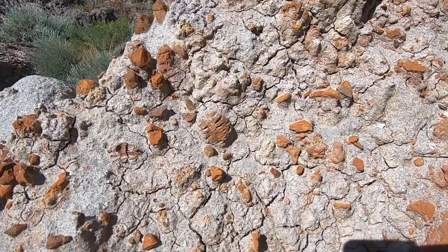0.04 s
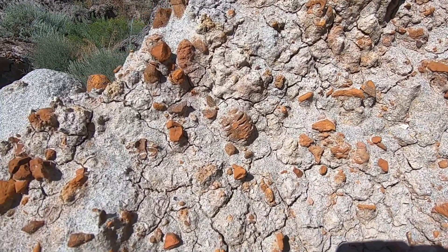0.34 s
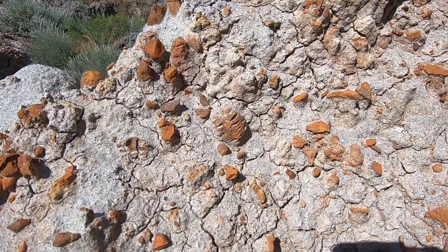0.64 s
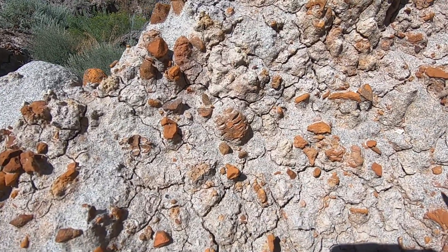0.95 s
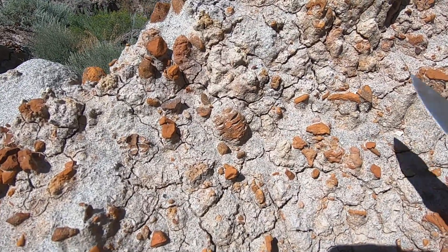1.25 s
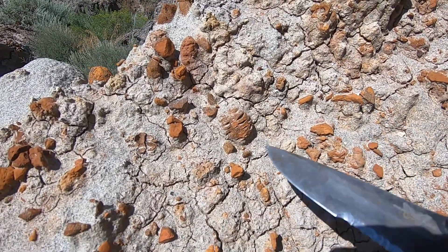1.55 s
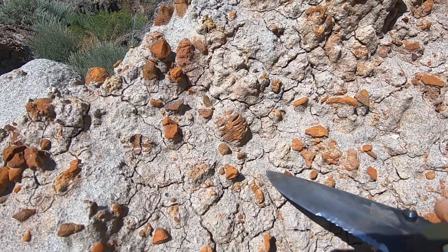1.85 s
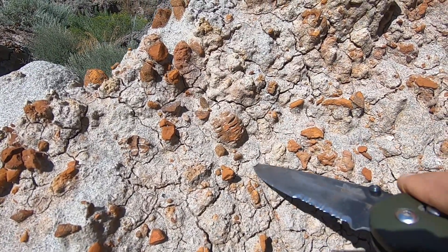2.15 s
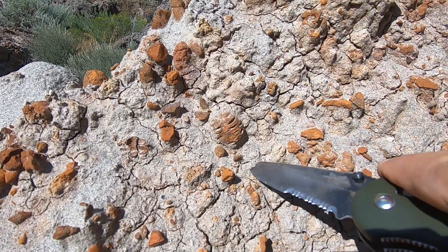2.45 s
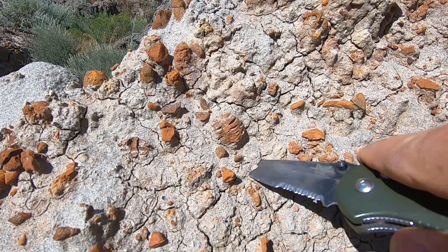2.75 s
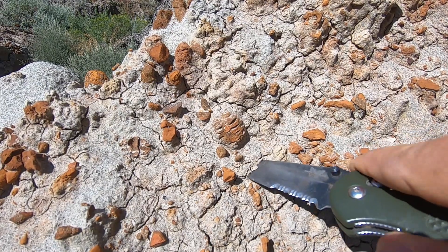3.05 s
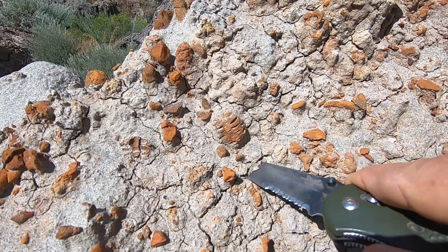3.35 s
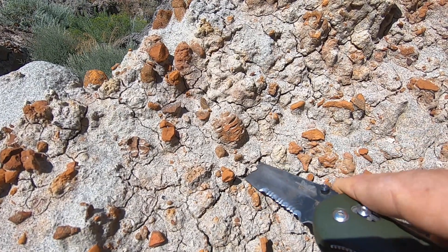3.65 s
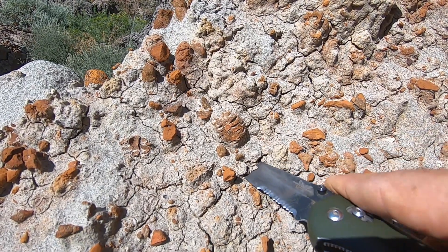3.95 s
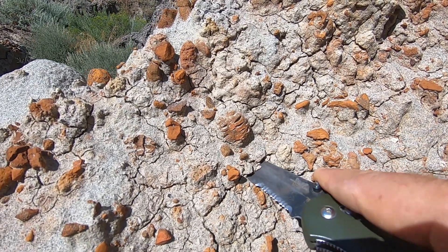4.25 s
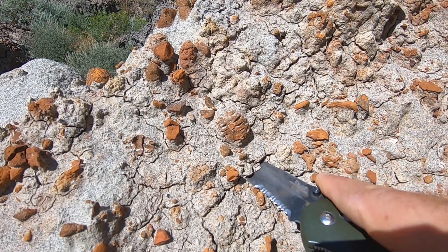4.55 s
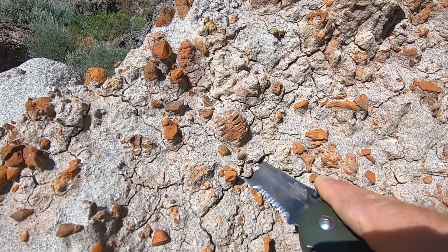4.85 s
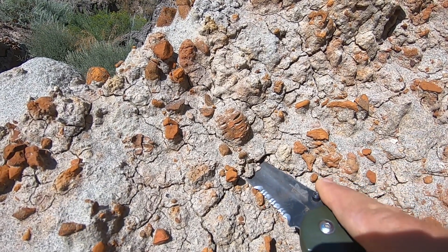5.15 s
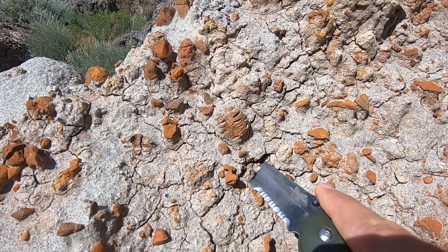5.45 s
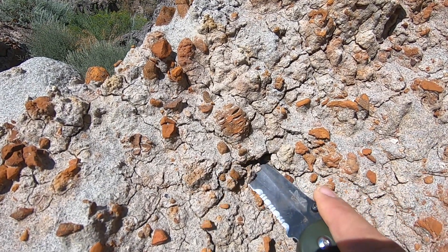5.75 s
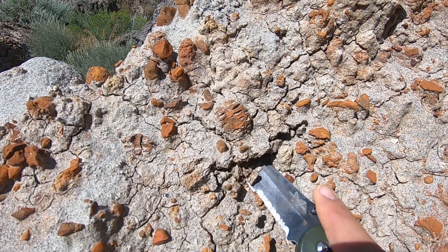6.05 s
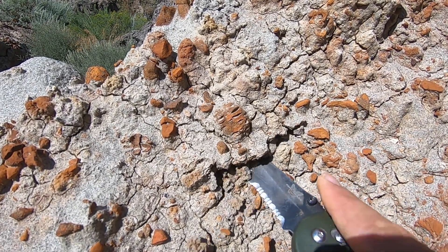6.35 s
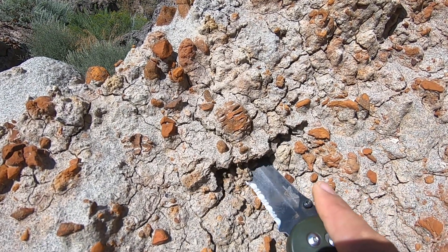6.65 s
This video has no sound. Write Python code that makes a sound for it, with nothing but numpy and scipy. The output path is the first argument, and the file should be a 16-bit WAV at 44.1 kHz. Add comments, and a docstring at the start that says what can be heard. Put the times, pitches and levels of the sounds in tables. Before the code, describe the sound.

A low thump of wind hits the microphone at the very start, followed by finger knocks, rubbing and dull bumps on it until about 0.5 seconds, with a faint sleeve rustle. At about 1.1 seconds a folding knife snaps open with a sharp, loud metallic click, and a hand slides softly on the handle. From 2 seconds the tip scratches crumbly rock, close and slightly to the right, in short, irregular, gritty strokes, with light steel ticks on pebbles and small crunches as flakes break off. A few very faint, thin, high chirps sound far away around 2 and 4 seconds. The microphone is knocked again near 4.3 and 6.5 seconds. The scraping eases around 5 seconds, then resumes as crumbs trickle down. From about 5.4 seconds low wind rumble builds in gusts, strongest at the end, near 7 seconds.

```python
"""A gust of wind thumps on the microphones; fingers knock and rub on a hand-held camera, exciting the
modes of its case, and a sleeve rustles. A folding knife snaps open with a rattle of steel impacts.
Its tip ticks on pebbles and scrapes crumbly rock in short strokes: tiny fractures make the hiss and
drive the blade's resonances, flakes crack off and crumbs trickle down. Thin, high chirps sound far off,
and the wind builds again near the end."""
import sys
import numpy as np
from scipy import signal
from scipy.fft import rfft, irfft
from scipy.io import wavfile
from scipy.ndimage import map_coordinates

SR = 44100
rng = np.random.default_rng(int(sys.argv[2]) if len(sys.argv) > 2 else 0)


def store_wav(level_fs):
    """Save 16-bit WAV to argv[1]."""
    pcm = np.round(np.clip(np.atleast_2d(level_fs), -1, 1) * 32767)
    wavfile.write(sys.argv[1], SR, pcm.T.astype(np.int16))


N = 304485
TIME = np.arange(N) / SR

# Levels in the tables are relative: the functions add gains of their own.
# gusts on the microphones: start_s, rise_s, fall_s, level_db, left_minus_right_db
GUSTS = [(-.03, 0.027, 0.023, -14, 1), (5.39, 0.11, 0.088, -37.5, 11), (5.62, 0.022, .12, -34.5, 22),
         (5.81, 0.067, 0.091, -32, 14), (5.96, 0.062, 0.14, -31, 9), (6.22, 0.076, 0.12, -36.5, 2.5),
         (6.42, 0.065, 0.46, -40, 2), (6.6, 0.19, 0.079, -36, 1), (6.82, 0.086, .1, -27, 1)]
# spectra of the eddies and of still air: frequency_hz, density_db
WIND_SPECTRUM = [(10, -5), (20, 4.5), (36, 4.5), (85, -1.5), (130, -14), (180, -18.5), (260, -37.5),
                 (500, -47.5), (1000, -68.5)]
AIR_SPECTRUM = [(20, -16), (90, -7.5), (180, 6.5), (450, -5), (850, 2), (2200, -5), (4200, -4), (5800, 1),
                (7600, -12), (9600, -6), (11500, -30), (15500, -48)]

# arm sweeps and squeezes of the hand: start_s, rise_s, fall_s, level_db
SWEEPS = [(0, 0.33, 0.31, -56.5), (.67, 0.026, 0.032, -60), (.78, 0.27, 0.074, -51.5),
          (1.225, 0.024, 0.035, -52), (1.3, .04, 0.23, -57), (1.73, 0.065, 0.053, -56.5)]
SQUEEZES = [(1.85, 0.15, 0.19, -49.5), (2.55, 0.14, 0.15, -50), (3.92, 0.081, 0.46, -59),
            (4.74, 0.028, 0.22, -54)]
# spectra of the arm's rustle and the hand's hum: frequency_hz, density_db
RUSTLE_SPECTRUM = [(200, -51), (500, -12), (1000, 2), (1700, 5.5), (2900, 6), (4300, 4), (5800, 10),
                   (7700, -2), (9800, 2), (11300, -16.5), (15500, -21)]
HAND_SPECTRUM = [(25, -40), (90, -23.5), (135, -2), (175, 10.5), (230, 1.5), (400, -11.5), (800, -43)]
# scuffs of the hand on the knife and finger knocks on the camera: start_s, level_db
SCUFFS = [(0.324, -31.5), (0.499, -34), (0.535, -29), (1.238, -41)]
KNOCKS = [(0.053, -44), (0.178, -31.5), (0.21, -24.5), (0.216, -29), (0.283, -21.5), (0.29, -32),
          (0.322, -30), (0.357, -27.5), (0.376, -26), (0.389, -25), (0.406, -26.5), (0.58, -47),
          (0.591, -35.5), (0.667, -41.5), (2.649, -34.5), (2.887, -33.5), (2.905, -27), (4.045, -34),
          (4.075, -43), (4.244, -35), (4.27, -19), (4.476, -43.5), (6.492, -17.5)]
# finger rubs, jolts of the grip and a skin squeak on the camera: start_s, rise_s, fall_s, level_db
RUBS = [(.16, 0.017, 0.044, -37), (.195, 0.012, 0.074, -33.5), (.278, 0.0028, 0.18, -32),
        (.35, 0.02, 0.11, -33), (.57, 0.015, 0.071, -58), (1.88, 0.17, 0.036, -51.5),
        (2.6, 0.071, 0.1, -49), (2.884, 0.0088, 0.016, -47), (3.95, 0.098, 0.031, -45),
        (4.22, 0.018, 0.048, -39.5), (4.28, 0.026, 0.015, -49), (4.9, 0.034, 0.054, -54),
        (6.485, 0.0082, 0.025, -34)]
JOLTS = [(.152, 0.019, 0.097, -34), (.281, 0.0055, 0.05, -20.5), (.335, 0.019, 0.034, -26)]
SQUEAKS = [(.175, 0.13, 0.11, -42.5)]
# modes of the case, the whole camera rocking, and skin on the case: pitch_hz, level_db, t60_s
CASE_MODES = [(307, -15, 0.079), (506, -21, 0.17), (718, -3, 0.069), (1116, 7.5, 0.03), (1270, 6, 0.02),
              (1820, 4, 0.019), (1930, 0, 0.03)]
ROCKING_MODES = [(177, 2, 0.065), (313.3, -6.5, 0.09), (386, -3, 0.021), (500, -4, 0.036),
                 (656, 5.5, 0.012), (1460, -13, 0.0048)]
SQUEAK_MODES = [(2740, -6.5, 0.011), (3670, -6, 0.0076), (4550, 1, 0.0076), (6000, -4, 0.009)]
# spectra of a jolt and of the sleeve's threads: frequency_hz, density_db
JOLT_SPECTRUM = [(20, -24), (50, 11.5), (80, 4), (120, 7), (180, 1.5), (260, -18), (500, -21), (1000, -61)]
SLEEVE_SPECTRUM = [(500, -31), (1500, -7), (4500, 4.5), (6200, 2.5), (7600, -5), (9600, 4.5), (11200, -16),
                   (14500, -20), (15500, -39)]
# light scratches of the sleeve: start_s, rise_s, fall_s, level_db
SLEEVE_SCRATCHES = [(.425, 0.0074, .025, -61), (.532, .004, 0.013, -51), (.625, 0.0065, 0.013, -60),
                    (.69, 0.022, 0.047, -54.5), (1.03, 0.18, 0.06, -60.5), (1.3, 0.041, 0.081, -57)]
# hollow taps from the handling: start_s, level_db, pitch_hz
TAPS = [(.634, -51, 430), (.69, -54, 415), (6.493, -36, 498)]

# contacts of the blade swinging into its lock: start_s, level_db
LOCK_CONTACTS = [(1.0772, -11), (1.0776, -13.5), (1.0792, -10), (1.0797, -8), (1.0803, -7.5), (1.081, -2.5),
                 (1.081, -9.5), (1.0825, -11.5)]
# spectrum of steel cracking on steel: frequency_hz, density_db
SNAP_SPECTRUM = [(400, -30), (2500, -2), (9500, -7), (14000, -18)]
# modes of the knife's frame and liner, its handle and the rubbed steel: pitch_hz, level_db, t60_s
FRAME_MODES = [(840, -16, 0.0049), (2190, -3.5, 0.0064), (2730, -10, 0.0057), (3460, -16, 0.012),
               (4800, -7.5, 0.0028), (6360, -11.5, 0.01), (7000, -10, 0.01), (8630, -6, 0.0041),
               (9750, -15.5, 0.008), (9750, -16, 0.0081)]
HANDLE_MODES = [(1400, 1, 0.0088), (2270, 8.5, 0.0073), (2710, 11.5, 0.0046), (3700, -15, 0.011),
                (5600, 8.5, 0.0064), (6400, -18, 0.004)]
STEEL_MODES = [(2870, 2, 0.019), (3830, 0, .03), (5700, -9, 0.028), (6600, -4, .018)]
# a finger drawn along the steel and the hand sliding to a new hold: start_s, rise_s, fall_s, level_db
FINGER_DRAWS = [(1.335, 0.071, 0.089, -56.5), (1.47, 0.069, .03, -52)]
HAND_SLIDES = [(1.5, 0.069, 0.024, -42.5), (1.675, 0.0093, 0.0085, -54)]

# the tip catches on pebbles: start_s, level_db, ring_db, pitch_ratio, rebound_ratio
TICKS = [(1.721, -43, 2.5, 1.01, 0.62), (2.032, -45, -3.5, 1, 0.65), (2.111, -43.5, 1, .5, 0.2),
         (2.189, -39.5, -1.5, 1.52, 0.1), (2.216, -41, -4, .5, 0.1), (2.7, -41, -3, 1.06, 0.2),
         (2.758, -28.5, -6, 1.03, 0.27), (2.9284, -35.5, -3, 1.04, 0.3), (2.956, -44, -6, 1.3, .2),
         (3.086, -36, -7, 1, 0), (3.272, -47, 1, 0.91, 0.28), (3.384, -42, -7, 0.92, 0.3),
         (3.516, -40.5, -1.5, 1.05, .05), (3.728, -46, -14, .63, 0), (3.799, -52, 0, 1.04, .3),
         (3.905, -37, -16, 0.95, 0.53), (4.1558, -30, -5, 1.2, 0.1), (4.178, -37, -10, 1.03, 0.61),
         (4.502, -38, -24, 0.46, 0.75), (4.718, -44, 6, 0.96, 0.67), (4.751, -34.5, -8, 0.72, 0.66),
         (5.588, -53, 3, 0.83, 0.1), (5.7961, -51.5, 9, 0.98, 0.82), (5.82, -39.5, -5, 0.6, 0.74),
         (5.9648, -34, -16, 0.97, 0.2), (5.98, -39, -3, 1.01, 0.64), (6.045, -40.5, -6, 0.88, 0.2),
         (6.102, -35.5, -2, 1.1, 0), (6.5442, -39.5, 0.5, .86, 0.16), (6.5927, -29, -17, 0.99, 0.36),
         (6.73, -42, 3, 1.03, 0.71)]
# modes of the briefly ringing blade: pitch_hz, level_db, t60_s
BLADE_MODES = [(2870, -30, 0.033), (4000, -13.5, 0.024), (5300, -7.5, 0.042), (5554, -3, 0.019),
               (5830, -3, 0.017), (6350, -18, 0.012), (6500, -25, .012), (8830, -13.5, 0.038),
               (9470, -15.5, 0.015)]
# far chirps: start_s, length_s, from_hz, to_hz, level_db
CHIRPS = [(1.863, 0.028, 9900, 9150, -74.5), (1.938, 0.023, 9200, 8900, -65.5),
          (3.997, 0.062, 9000, 9260, -59.5), (4.38, 0.07, 8100, 8700, -75)]
# strokes of the tip over the rock: start_s, rise_s, fall_s, level_db, brightness_db, blade_song_db
STROKES = [(2.065, 0.059, 0.081, -46.5, 12.5, 4), (2.2, 0.086, 0.019, -45, 14, 3),
           (2.31, 0.011, 0.026, -51.5, -1, -4), (2.428, 0.03, 0.12, -41, 10, -9.5),
           (2.56, 0.034, 0.16, -40.5, 9, -5), (2.738, 0.029, 0.059, -37.5, 11, 2),
           (2.868, 0.024, 0.077, -44, 9.5, -10), (3.0, 0.022, 0.045, -40, 13, -1.5),
           (3.06, 0.022, 0.12, -51, 11.5, -4), (3.252, 0.017, 0.08, -46, 9.5, 0),
           (3.355, 0.037, 0.13, -53, 13.5, -7.5), (3.557, 0.033, 0.04, -43, 8, -8),
           (3.63, 0.043, 0.082, -59, 10, -17), (3.83, 0.12, 0.1, -52, 10.5, -17),
           (4.02, 0.051, 0.028, -56.5, 13.5, -4), (4.121, 0.014, .088, -42.5, 15, -8),
           (4.165, 0.017, 0.069, -43.5, 8.5, 1), (4.28, 0.022, 0.02, -58, 9.5, -17),
           (4.497, 0.0029, 0.13, -55.5, 8, -32), (4.715, 0.0057, 0.022, -52, 2, -25),
           (4.75, 0.0016, 0.039, -37.5, -15, -39), (4.79, 0.02, 0.042, -52.5, 10, -15),
           (4.885, 0.03, 0.055, -56.5, -11, -32), (5.055, 0.14, 0.029, -62.5, 11.5, -16),
           (5.3, 0.091, 0.14, -63, 7.5, -5), (5.56, 0.17, 0.064, -59.5, 10, -6),
           (5.79, 0.1, 0.073, -54.5, 10, -11.5), (5.95, 0.021, 0.12, -47, -2.5, -2),
           (6.07, 0.04, 0.14, -54.5, 9.5, -5), (6.32, 0.13, 0.077, -49, 6.5, -20),
           (6.553, 0.0022, 0.072, -44, 10, -31)]
# modes of the blade damped against the rock: pitch_hz, bandwidth_hz, level_db
PRESSED_MODES = [(2915, 300, 10), (5700, 320, -2)]
# shift of those modes with the point of contact: time_s, pitch_ratio
CONTACT_PITCH = [(1.5, 1.02), (2.1, 0.94), (2.28, 0.93), (2.5, 1.05), (2.8, 1), (3.1, 0.91), (3.29, .9),
                 (3.6, 1.04), (6.9, 0.94)]
# spectra of crumbling rock, its crust, and sand cracking under the edge: frequency_hz, density_db
GRIT_SPECTRUM = [(120, -31), (300, -7), (600, -9.5), (1000, -11.5), (1400, -5), (1850, -6.5), (2250, -6),
                 (4300, -1.5), (6400, -1.5), (7400, -12.5), (9800, -14), (11000, -24.5), (13500, -30),
                 (15500, -40)]
CRUST_SPECTRUM = [(120, -17), (200, 4), (330, -5), (480, 0), (750, -11), (1200, 1), (1600, 2), (2300, -8),
                  (3000, -2.5), (5000, -12.5), (12000, -48)]
SIZZLE_SPECTRUM = [(2000, -39), (6200, -14), (7500, 6.5), (9600, -0.5), (10800, -21), (13500, -20),
                   (15500, -48)]
# bits of crust give way: start_s, level_db, pitch_hz
CRUNCHES = [(2.326, -43.5, 1790), (2.628, -36.5, 1730), (2.888, -43, 1700), (2.904, -36, 1920),
            (3.76, -50, 2420), (3.951, -36.5, 1930), (3.972, -44, 2160), (4.015, -44.5, 2490),
            (4.045, -40.5, 1900), (4.058, -44.5, 2400), (4.078, -41, 2540), (4.269, -39.5, 1500),
            (4.753, -43, 480), (4.904, -48, 1540), (5.823, -47, 3600), (5.983, -42.5, 2150),
            (6.176, -49, 950), (6.376, -42, 1400), (6.46, -40.5, 1400)]
# runs of loosened crumbs: start_s, rise_s, fall_s, level_db
TRICKLES = [(5.38, 0.11, 0.052, -62), (5.65, 0.3, .2, -69), (6.3, 0.17, 0.29, -61.5)]
# larger crumbs land: start_s, level_db, pitch_hz
CRUMBS = [(5.447, -44, 5700), (5.521, -43, 2800), (5.88, -42, 5600), (5.893, -38.5, 4900),
          (5.931, -41.5, 3930), (6.235, -49, 3630), (6.283, -43, 5400), (6.408, -43, 3600),
          (6.425, -44, 4900)]

TOUCH_DB = -60.5   # stroke level of the tip merely resting on the rock


def from_db(db):
    """Amplitude grows tenfold for every 20 dB."""
    return 10 ** (np.asarray(db) / 20)


def unit_rms(x):
    """Division by the root mean square gives unit power."""
    return x / np.sqrt(np.mean(x ** 2) + 1e-20)


def drift(rate_hz):
    """Low-passed noise wanders slowly, with unit spread."""
    step, settle = 40, 2000
    pole = np.exp(-2 * np.pi * rate_hz * step / SR)
    slow = signal.lfilter([1], [1, -2 * pole, pole * pole], rng.standard_normal(N // step + settle + 2))
    slow = unit_rms(slow[settle:])
    return np.interp(np.arange(N) / step, np.arange(len(slow)), slow)


def colour(x, spectrum, size=4096):
    """A minimum-phase filter of unit power gain imposes a spectrum."""
    hz, db = np.transpose(spectrum)
    log_hz = np.log(np.maximum(np.arange(size // 2 + 1) * SR / size, 1))
    cepstrum = irfft(np.log(from_db(np.interp(log_hz, np.log(hz), db))))
    cepstrum[1:size // 2] *= 2
    cepstrum[size // 2 + 1:] = 0
    response = irfft(np.exp(rfft(cepstrum)))
    return signal.oaconvolve(np.atleast_2d(x), response[None] / np.linalg.norm(response))[:, :N]


def soften(x, hz, order=4):
    """Low-pass filtering: a contact that takes some time has little treble."""
    return signal.sosfilt(signal.butter(order, min(hz, .45 * SR), fs=SR, output="sos"), x)


def ring(force, hz, t60):
    """A damped resonator answers a unit impulse with a sinusoid that falls 60 dB in t60 seconds."""
    radius, angle = from_db(-60 / (t60 * SR)), 2 * np.pi * hz / SR
    return signal.lfilter([1, 0, -1], [1, -2 * radius * np.cos(angle), radius ** 2], force + 1e-18) / 2


def body(force, modes):
    """Superposition: an object's response is the sum of its modes."""
    return sum(from_db(db) * ring(force, hz, t60) for hz, db, t60 in modes)


def clicks(times, db):
    """Each brief contact is an impulse."""
    out = np.zeros(N)
    out[np.round(np.asarray(times) * SR).astype(int)] = from_db(db)
    return out


def struck(times, db, modes, vary_db):
    """Impact excitation: every contact drives every mode with a strength of its own."""
    scatter_db = vary_db * rng.standard_normal((len(times), len(modes)))
    return sum(ring(clicks(times, db + mode_db + scatter_db[:, k]), hz, t60)
               for k, (hz, mode_db, t60) in enumerate(modes))


def fading(impulses, t60):
    """Exponential decay: an envelope jumps at each impulse and dies away."""
    return signal.lfilter([1], [1, -from_db(-60 / (t60 * SR))], impulses + 1e-18)


def grains(per_s, spread_db):
    """Shot noise: random impulses, many small and a few large, with unit power at any rate."""
    per_s = np.maximum(per_s, 100)
    sizes = from_db(spread_db * np.minimum(rng.exponential(1, N), 4)) * rng.choice([-1, 1], N)
    return unit_rms(sizes * (rng.random(N) < per_s / SR) / np.sqrt(per_s))


def pair(shared, own, alike):
    """Partial correlation: two microphones hear a shared part and a part of their own."""
    return np.sqrt(alike) * shared + np.sqrt(1 - alike) * own


def noise(alike):
    """White noise, partly correlated between two microphones."""
    return pair(rng.standard_normal(N), rng.standard_normal((2, N)), alike)


def pan(x, left_db):
    """A level difference at constant power places a sound to one side."""
    gains = from_db(np.array([[.5], [-.5]]) * left_db)
    return x * gains / np.sqrt(np.mean(gains ** 2, axis=0))


def swells(rows, base_db, edge_s, curve=0.9):
    """Rising and falling gestures add in power; gives the level in dB, then any further columns."""
    t = TIME[::32]
    start, rise, fall, peak_db, *columns = np.transpose(rows)[:, :, None]
    since, remaining = t - start, start + rise + fall - t
    force = np.clip(np.minimum(since / rise, remaining / fall), 0, 1) ** curve
    outside_s = np.maximum(-np.minimum(since, remaining), 0)
    fade_db = 20 * np.minimum(outside_s / edge_s, 10)
    power = from_db(base_db + (peak_db - base_db) * force - fade_db) ** 2
    total = power.sum(axis=0)
    weighted = [(power * column).sum(axis=0) / total for column in columns]
    return [np.interp(TIME, t, track) for track in [10 * np.log10(total)] + weighted]


def stroke_envelopes():
    """The tip's strokes modulate level, brightness and blade song, all in dB."""
    return swells(STROKES, base_db=TOUCH_DB, edge_s=0.05, curve=0.64)


def wind(calm_db=-81.5):
    """Turbulence: eddies press on each microphone port, gust by gust."""
    level_db, left_db = swells(GUSTS, base_db=-51, edge_s=0.056)
    eddies = unit_rms(colour(noise(alike=0.34), WIND_SPECTRUM, size=16384) * from_db(2.0 * drift(22.6)))
    return pan(from_db(level_db) * eddies, left_db) + from_db(calm_db) * eddies


def open_air():
    """A diffuse field: faint, steady noise, almost uncorrelated between the microphones."""
    return from_db(-64.5) * pan(colour(noise(alike=0.01), AIR_SPECTRUM), left_db=0.5)


def hand_and_arm(rest_db=-68, push_db=-70):
    """Modulated noise: the arm rustles; the hand hums as it squeezes and pushes, and scuffs the knife."""
    squeeze_db, = swells(SQUEEZES, base_db=-66.0, edge_s=0.097)
    push = soften(from_db(push_db + stroke_envelopes()[0] - TOUCH_DB), hz=11.0, order=1)
    effort = np.sqrt(from_db(rest_db) ** 2 + from_db(squeeze_db) ** 2 + push ** 2)
    hum = effort * colour(noise(alike=0.54), HAND_SPECTRUM)
    sweep_db, = swells(SWEEPS, base_db=-56.5, edge_s=0.053)
    flicker_db = 2.6 * drift(43) + 2 * np.tanh(drift(2.5))
    rustle = from_db(sweep_db + flicker_db) * colour(noise(alike=0.18), RUSTLE_SPECTRUM)
    times, db = np.transpose(SCUFFS)
    scuff_envelope = soften(fading(clicks(times, db - 7.0), t60=0.15), hz=151, order=1)
    scuffs = scuff_envelope * unit_rms(soften(body(noise(alike=0.73), FRAME_MODES[:5]), hz=6900))
    return hum + pan(rustle + scuffs, left_db=-7.5)


def camera_case(lag_s=.00008):
    """Structure-borne sound: knocks and rubs flex the case, driving the microphones in antiphase."""
    times, db = np.transpose(KNOCKS)
    rub_db, = swells(RUBS, base_db=-60.0, edge_s=0.14)
    rubbing = from_db(rub_db) * grains(1500, 3.1)
    # a finger pad lands gradually, in three touches, and skids a little
    knocks = sum(struck(times + late_s, db + share_db - 2.0, CASE_MODES, vary_db=1.5)
                 for late_s, share_db in [(-.0009, -13), (0, -6), (.0009, -6)])
    skids = fading(clicks(times, db + 2.0), t60=0.043) * rng.standard_normal(N)
    flex = soften(0.096 * body(rubbing, CASE_MODES) + knocks + skids, hz=1836, order=8)
    antiphase = np.array([flex, -np.interp(TIME - lag_s, TIME, flex)])
    # heavy knocks also rock the whole camera, heard on the right
    thuds = struck(times, db - 16.5 + 0.091 * (db - db.max()), ROCKING_MODES, vary_db=1.5)
    rocking = soften(0.035 * body(rubbing, ROCKING_MODES) + thuds, hz=1340)
    return antiphase + pan(rocking, left_db=-36.0)


def shifting_grip():
    """The grip jolts the camera with low thumps, and friction of skin on the case excites a squeak."""
    jolt_db, = swells(JOLTS, base_db=-37.5, edge_s=0.0091)
    jolt = from_db(jolt_db) * colour(noise(alike=0.14), JOLT_SPECTRUM)
    squeak_db, = swells(SQUEAKS, base_db=-55.0, edge_s=0.031)
    friction = noise(alike=0.72) * from_db(3.7 * drift(50))
    squeak = from_db(squeak_db) * unit_rms(soften(body(friction, SQUEAK_MODES), hz=6430))
    return pan(jolt + squeak, left_db=-8.5)


def sleeve_scratches():
    """Stick-slip friction: threads of the sleeve catch and let go in short, grainy runs."""
    level_db, = swells(SLEEVE_SCRATCHES, base_db=-67.5, edge_s=0.038)
    own = np.array([grains(2800, 3.0) for side in range(2)])
    threads = pair(grains(2300, 2.4), own, alike=0.35)
    return from_db(level_db) * pan(colour(threads, SLEEVE_SPECTRUM), left_db=-8.0)


def hollow_taps():
    """Free vibration: each tap of the handling rings briefly in one low mode."""
    return sum(soften(ring(clicks([start], db), hz, t60=0.057), hz=910) for start, db, hz in TAPS)


def lock_snap():
    """Steel impacts excite the knife's frame; its high modes reach each microphone differently."""
    times, db = np.transpose(LOCK_CONTACTS)
    low = struck(times, db - 5.5, FRAME_MODES[:5], vary_db=2.0)
    high = np.array([
        struck(times + rng.uniform(0, 0.00014, len(times)), db - 8.0, FRAME_MODES[5:], vary_db=2.0)
        for side in range(2)])
    crack = colour(fading(clicks(times, db - 18.0), t60=0.0022) * noise(alike=0.16), SNAP_SPECTRUM)
    tail = colour(fading(clicks(times, db - 25.5), t60=0.018) * noise(alike=0.1), GRIT_SPECTRUM)
    snap = pan(soften(low, hz=8850) + crack + tail, left_db=-12.5)
    snap += pan(soften(high, hz=11000), left_db=-4.0)
    # so small a part radiates no bass
    return signal.sosfilt(signal.butter(3, 480, "high", fs=SR, output="sos"), snap)


def skin_on_knife():
    """Forced vibration: the friction of sliding skin sounds the modes of the steel and the handle."""
    slide_db, = swells(HAND_SLIDES, base_db=-62.5, edge_s=0.14)
    handle = from_db(slide_db) * unit_rms(soften(body(noise(alike=0.29), HANDLE_MODES), hz=9200))
    draw_db, = swells(FINGER_DRAWS, base_db=-70.5, edge_s=.03)
    friction = noise(alike=.6) * from_db(2.7 * drift(70))
    steel = from_db(draw_db) * unit_rms(soften(body(friction, STEEL_MODES), hz=8000))
    return pan(handle + steel, left_db=-10.0)


def pebble_ticks(rebound_s=.0038, vary_db=2.5, size=4096):
    """Inelastic rebound: the tip catches and bounces ever more weakly, cracking grit and ringing."""
    catches, rings, impulse = np.zeros(N), np.zeros((2, N + size)), signal.unit_impulse(size)
    for start, db, ring_db, pitch_ratio, rebound_ratio in TICKS:
        gaps = rebound_s * rng.uniform(.6, 1.4, 4)
        contacts = np.round((start + np.append(0, np.cumsum(gaps))) * SR).astype(int)
        strengths = from_db(db) * rebound_ratio ** np.arange(len(contacts))
        note = np.array([body(impulse, [(hz * pitch_ratio, mode_db + vary_db * rng.standard_normal(), t60)
                                        for hz, mode_db, t60 in BLADE_MODES]) for side in range(2)])
        catches[contacts] += strengths
        for at, strength in zip(contacts, strengths):
            rings[:, at:at + size] += strength * from_db(ring_db) * note
    crack = from_db(-7.5) * colour(fading(catches, t60=0.016) * noise(alike=0.9), GRIT_SPECTRUM)
    return crack + soften(rings[:, :N], hz=10600)


def far_chirps():
    """Frequency modulation: thin whistles glide and waver, perhaps a small bird's."""
    out, waver_hz = np.zeros(N), 35 * drift(54)
    for start, length, from_hz, to_hz, db in CHIRPS:
        along = np.clip((TIME - start) / length, 0, 1)
        hz = from_hz + (to_hz - from_hz) * along + waver_hz
        out += from_db(db) * np.sin(np.pi * along) * np.sin(2 * np.pi * np.cumsum(hz) / SR)
    return out


def blade_song(force, swell_db=4):
    """Damped resonance: the pressed blade's modes swell, fade and shift as the contact point moves."""
    song = sum(from_db(db + swell_db * np.tanh(drift(9.8))) * width_hz
               * ring(force, hz, t60=np.log(1000) / (np.pi * width_hz))
               for hz, width_hz, db in PRESSED_MODES)
    pitch_ratio = np.interp(TIME, *np.transpose(CONTACT_PITCH))
    # reading the vibration at a varying speed bends its pitch
    bent = [map_coordinates(side, [np.cumsum(pitch_ratio + .025 * drift(14)) % N], order=3)
            for side in soften(song, hz=8100)]
    return unit_rms(np.array(bent))


def flakes(per_s=2400, t60_cycles=32):
    """Size sets pitch: flakes chip off and ring; neighbours are of like size, so the pitch wanders."""
    when, scatter, strength, phase = rng.random((per_s * N // SR, 4)).T[:, :, None]
    start, age = (when * N).astype(int), np.arange(512)
    hz = 1700 * 5.6 ** ((.3 * drift(16)[start] + .3 * scatter) % 1)
    amplitude = from_db(2.6 * np.minimum(-np.log(strength), 3.5)) * np.sqrt(hz)
    envelope = amplitude * from_db(-60 * age / SR * hz / t60_cycles)
    pings = [envelope * np.sin(2 * np.pi * hz * age / SR + side * (phase - .5)) for side in (1, -1)]
    return unit_rms(np.array([np.bincount((start + age).ravel(), p.ravel(), N)[:N] for p in pings]))


def scraping(touch_grains_per_s=1100, flakes_db=-5, sizzle_db=-12.5):
    """Brittle fracture: the tip frees grains in jerks, more under more force; they excite the blade."""
    level_db, bright_db, song_db = stroke_envelopes()
    per_s = touch_grains_per_s * from_db(.9 * np.maximum(level_db - TOUCH_DB, 0))
    jerks = unit_rms(from_db(1.78 * drift(103)))
    own = np.array([grains(2 * per_s, 4.4) for side in range(2)])
    force = jerks * pair(grains(per_s, 2.8), own, alike=0.69)
    song = from_db(song_db) * blade_song(force)
    scrape = colour(unit_rms(force + from_db(flakes_db) * jerks * flakes()), GRIT_SPECTRUM) + song
    sizzle = from_db(sizzle_db) * colour(pair(grains(1400, 9.1), own, alike=0.15), SIZZLE_SPECTRUM)
    # a light, fast stroke is bright and sizzles; a digging one is dull
    bright = from_db(bright_db - 8.0)
    low = signal.sosfiltfilt(signal.butter(2, 5800, fs=SR, output="sos"), scrape)
    return from_db(level_db) * unit_rms(low + bright ** 0.5 * (scrape - low) + bright ** 1.5 * sizzle)


def crunching():
    """Sudden fracture: a flake of crust cracks, rings at its own pitch and crumbles in a dull burst."""
    times, db, _ = np.transpose(CRUNCHES)
    crack = colour(fading(clicks(times, db - 4.0), t60=0.0084) * noise(alike=1.0), GRIT_SPECTRUM)
    burst = colour(fading(clicks(times, db - 9.5), t60=0.093) * grains(6000, 3.0), CRUST_SPECTRUM)
    pings = sum(ring(clicks([start], level_db + 0.5), hz, t60=0.017) for start, level_db, hz in CRUNCHES)
    return crack + burst + pings


def trickling(bounces_per_s=500, t60_cycles=11):
    """Small impacts: crumbs bounce down the rock, each ringing for a few cycles at its own pitch."""
    trickle_db, = swells(TRICKLES, base_db=-69.5, edge_s=0.15)
    pitches_hz = np.geomspace(1900, 9500, 12)
    pitch_index = rng.integers(0, len(pitches_hz), N)
    bounces = grains(bounces_per_s, 2.0)
    patter = sum(ring(bounces * (pitch_index == k), hz, t60_cycles / hz)
                 for k, hz in enumerate(pitches_hz))
    fine = from_db(trickle_db) * unit_rms(soften(patter, hz=9800))
    times, db, _ = np.transpose(CRUMBS)
    pings = sum(ring(clicks([start], level_db - 4.0), hz, t60_cycles / hz)
                for start, level_db, hz in CRUMBS)
    cracks = colour(fading(clicks(times, db - 4.5), t60=0.018) * noise(alike=0.79), GRIT_SPECTRUM)
    return fine + soften(pings, hz=9460) + cracks


def scene():
    """Sound pressures add in open air; the knife works the rock a little to the right."""
    rock = pan(scraping() + pebble_ticks() + crunching() + trickling(), left_db=-4.0)
    close = rock + lock_snap() + sleeve_scratches() + skin_on_knife() + hollow_taps()
    handling = from_db(-6.0) * (camera_case() + shifting_grip() + hand_and_arm())
    return close + handling + wind() + far_chirps() + open_air()


def record(dry):
    """Band limiting: a steep low-pass filter cuts the treble above 15.7 kHz."""
    return signal.sosfilt(signal.ellip(10, .1, 80, 15700, fs=SR, output="sos"), dry)


dry = scene()
out = record(dry)
store_wav(out)
```